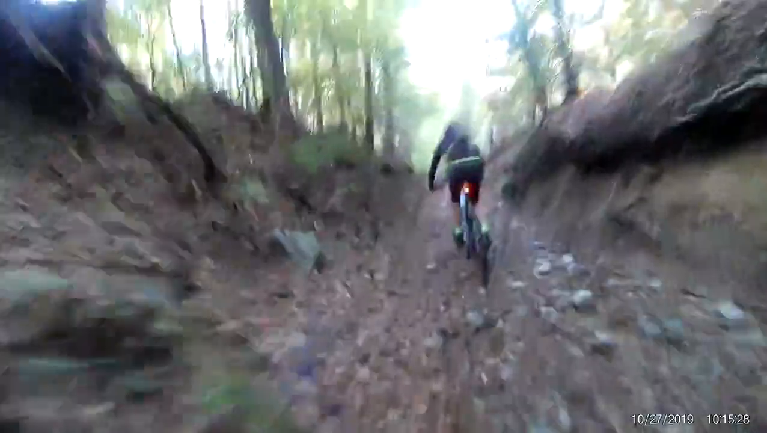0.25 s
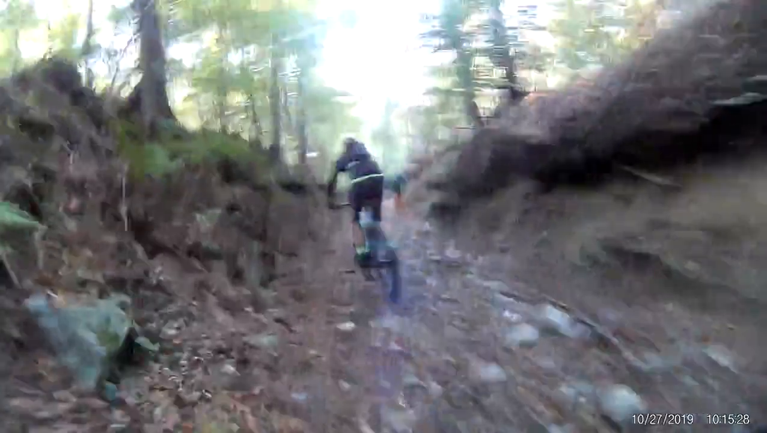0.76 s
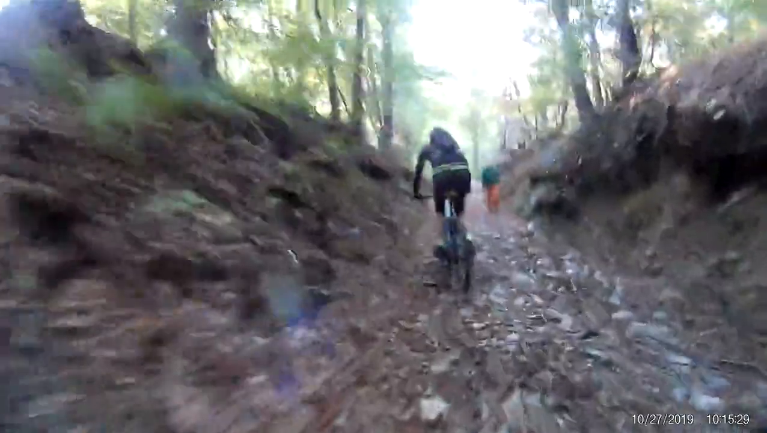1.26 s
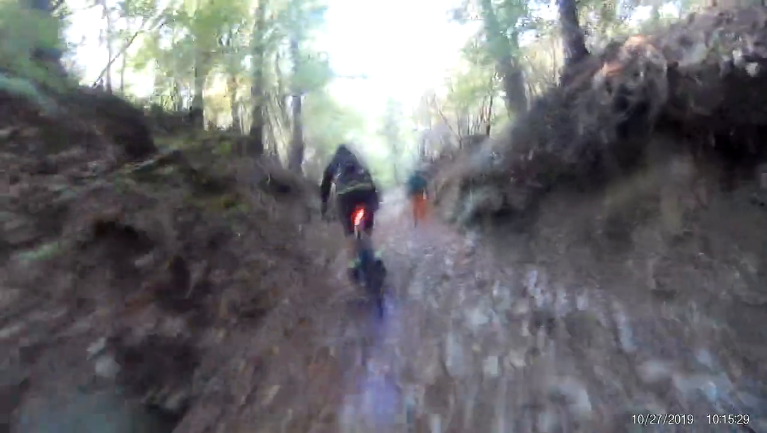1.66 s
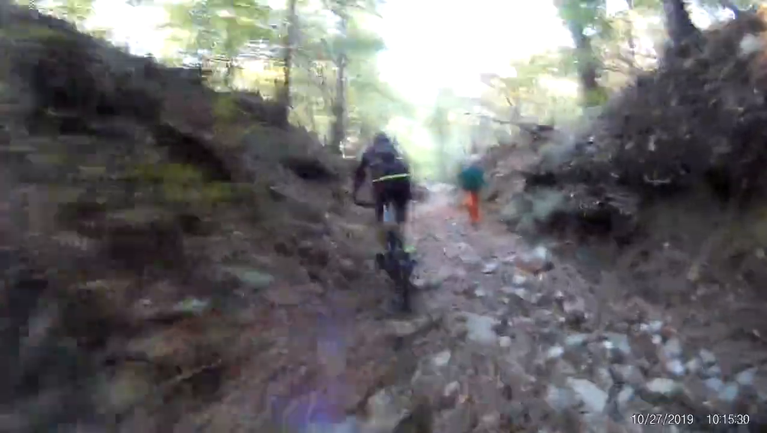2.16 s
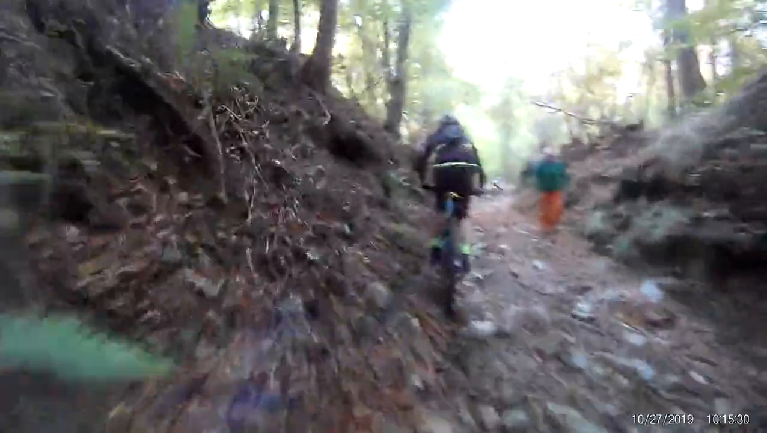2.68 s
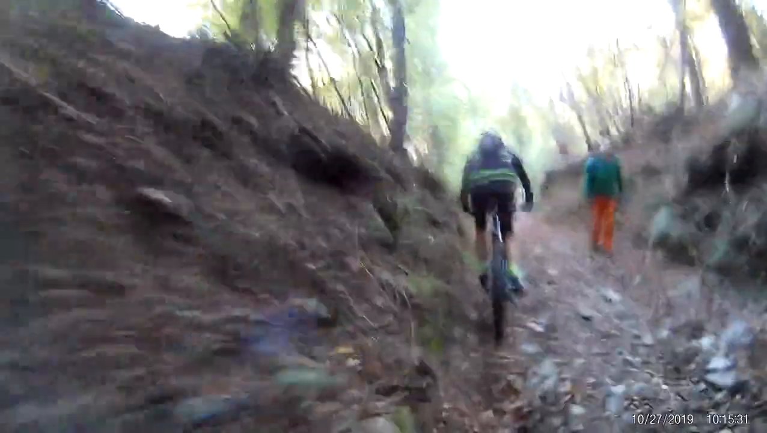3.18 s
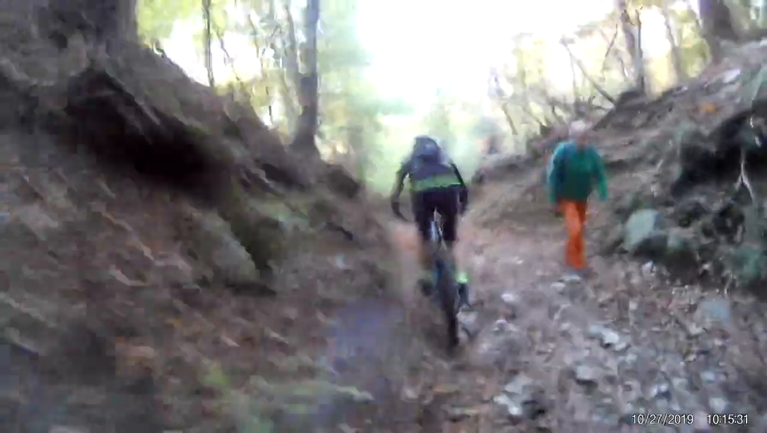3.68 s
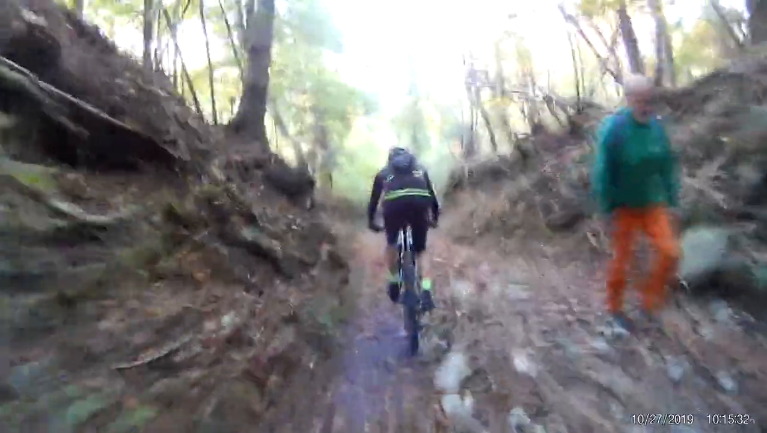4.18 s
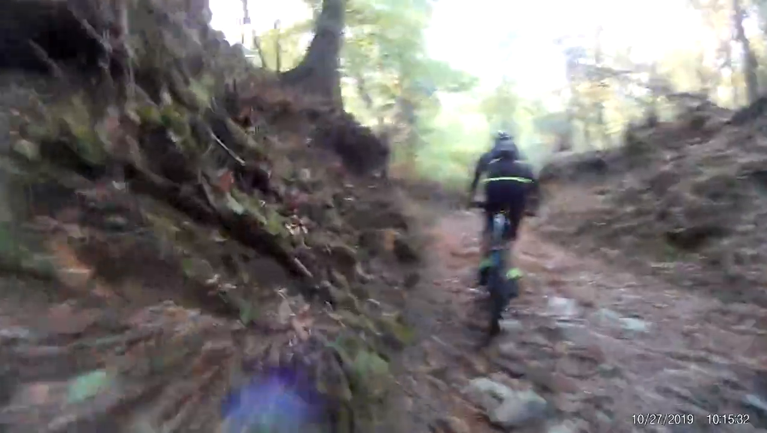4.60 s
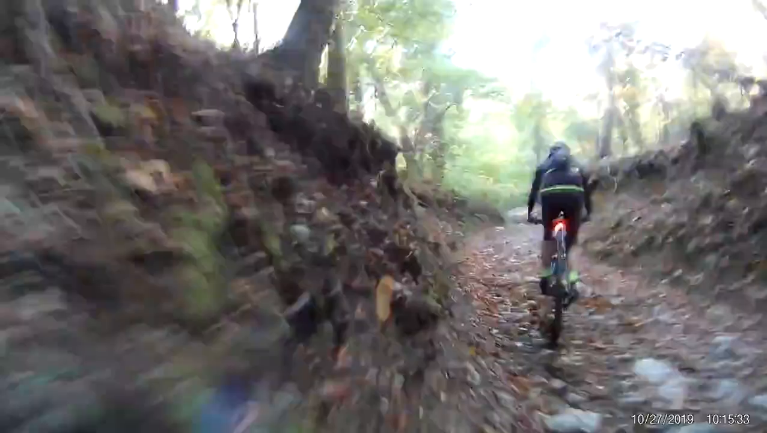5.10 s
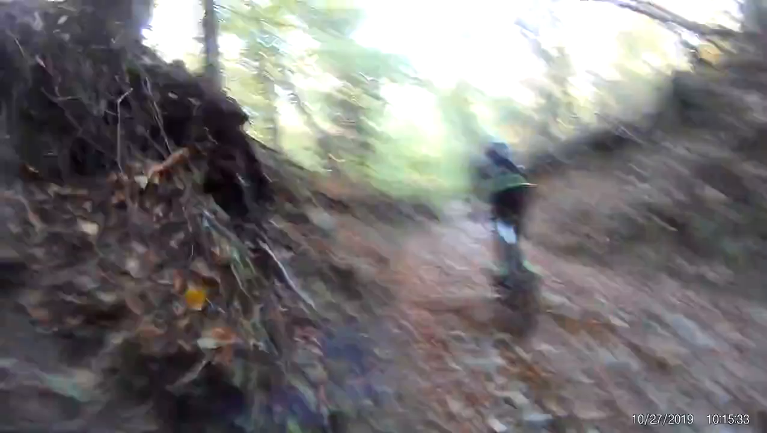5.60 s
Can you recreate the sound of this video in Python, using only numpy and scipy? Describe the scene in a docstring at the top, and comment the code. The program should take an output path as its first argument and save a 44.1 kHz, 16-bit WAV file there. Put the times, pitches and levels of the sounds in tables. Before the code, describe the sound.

A mountain bike runs along a stony forest trail, heard through a sealed camera clamped to it. Tyres buzz over a low rumble, with sharp ticks and rattles throughout. Three hard landings come early, with knocks and hollow clunks. Lighter bumps follow and bunch together past the middle, then the largest brings a brief overloaded crunch, and another heavy thump lands near the end. Everything sounds muffled.

```python
"""A mountain bike runs down a stony forest trail, heard through a sealed camera clamped to it.
From the start, tyre buzz and sharp ticks travel up the frame and ring the housing. Three hard landings
in about a second shove the camera, with knocks and hollow tube clunks. Lighter bumps then swing it on
its mount, bunching near 3.6 s; the largest, at 4.7 s, brings the crunch of an overloaded microphone,
and another heavy one comes at 5.5 s. Throughout, the closed case muffles the treble over a faint hiss."""
import sys
import numpy as np
from scipy.fft import rfft, irfft, next_fast_len
from scipy.io import wavfile
from scipy.ndimage import uniform_filter1d, map_coordinates

SR = 44100
rng = np.random.default_rng(int(sys.argv[2]) if len(sys.argv) > 2 else 0)


def log_audio(samples):
    """Write samples as a 16-bit WAV file to the path given in sys.argv[1]."""
    # one column per channel
    frames = np.atleast_2d(samples).T
    # limit to full scale, then quantise
    limited = np.clip(frames, -1, 1)
    pcm = np.round(limited * 32767).astype(np.int16)
    wavfile.write(sys.argv[1], SR, pcm)


N = 257984

# roughness of the trail: (t/s, mount shake level/dB, tyre buzz level/dB)
TRAIL = [(0.0, -23, -30.5), (0.44, -19.5, -31.5), (0.7, -21, -30.5), (0.95, -25.5, -33.5), (1.32, -24, -32),
         (1.81, -25, -31.5), (2.15, -21, -32), (2.54, -26.5, -33), (3.05, -19, -30.5), (3.39, -25, -33),
         (3.78, -19, -30), (4.22, -22.5, -30.5), (4.61, -21.5, -30.5), (5.03, -22, -31.5),
         (5.28, -20.5, -31), (5.62, -28.5, -32.5), (5.85, -16, -28.5)]
# sharp ticks; the two near 4.68 s stand for the crunch of the overloaded microphone on the largest bump:
# (t/s, level/dB, relative crack level/dB)
TICKS = [(0.037, -29.5, -30.5), (0.16, -21, -24), (0.181, -30, -32), (0.186, -14, -31.5),
         (0.2336, -24, -23.5), (0.2426, -25, -48), (0.2867, -31.5, -42), (0.307, -27, -34),
         (0.3256, -27, -33.5), (0.369, -28.5, -31), (0.5636, -27, -25), (0.5779, -26, -20),
         (0.6167, -14.5, -30), (0.6596, -20, -50), (1.043, -36, -21), (1.058, -29, -21.5),
         (1.084, -35, -18.5), (1.1029, -18.5, -26), (1.1315, -24.5, -29), (1.2678, -25.5, -42),
         (1.286, -29, -41), (1.345, -28.5, -40), (1.469, -35, -26), (1.484, -22, -32.5), (1.5365, -21, -28),
         (1.6363, -17, -28), (1.726, -29, -33), (1.921, -24.5, -40), (2.3022, -18.5, -23.5),
         (2.3228, -23.5, -29.5), (2.355, -23.5, -33), (2.38, -22, -36), (2.448, -32.5, -26.5),
         (2.544, -33.5, -24.5), (2.678, -35.5, -26.5), (2.8279, -27.5, -32), (2.938, -23.5, -15),
         (3.041, -21.5, -30), (3.171, -16, -28), (3.1863, -31.5, -42), (3.233, -31.5, -34),
         (3.2564, -21.5, -30), (3.2978, -28.5, -40), (3.3044, -24.5, -31.5), (3.5186, -26, -32.5),
         (3.6358, -27, -32), (3.6597, -11, -15), (3.695, -19, -23.5), (3.714, -26.5, -31),
         (3.7432, -32, -19), (3.921, -28, -30), (3.9859, -16, -23), (4.0118, -26.5, -36),
         (4.2287, -30.5, -28), (4.454, -38, -19), (4.541, -35, -22), (4.673, -37.5, -11.5),
         (4.6831, -30, -6), (4.806, -31, -29.5), (5.0535, -32.5, -25), (5.0798, -20.5, -29.5),
         (5.143, -37, -33), (5.538, -37.5, -25), (5.785, -30.5, -39)]
# dull knocks on the frame: (t/s, upper mode level/dB, lower mode level/dB)
KNOCKS = [(0.1341, -34, -22.5), (0.1615, -11.5, -25), (0.1755, -8.5, -5.5), (0.1854, -17.5, -10.5),
          (0.2359, -23, -20), (0.5581, -6.5, -9.5), (0.5794, -17, -14.5), (0.616, -18.5, -23),
          (0.6365, -14.5, -19.5), (0.6674, -10.5, -20), (0.8074, -26, -19), (1.0525, -16, -12.5),
          (1.0654, -28.5, -17), (1.1019, -15, -15.5), (1.1313, -21, -21), (1.267, -20, -16),
          (1.5384, -22.5, -26), (1.59, -21, -17.5), (1.62, -15.5, -15), (1.6354, -16.5, -18.5),
          (1.9155, -18, -14.5), (2.3022, -17.5, -18.5), (2.3241, -20, -24), (2.357, -22, -36.5),
          (2.379, -22.5, -24), (2.9218, -18, -21), (2.9362, -4.5, -8), (2.9564, -13, -17),
          (3.041, -13.5, -12), (3.1697, -12, -13.5), (3.2575, -22.5, -19.5), (3.6132, -20, -20.5),
          (3.6361, -13.5, -15.5), (3.6606, -9.5, -10), (3.6975, -13, -12.5), (3.9519, -17.5, -23),
          (3.9858, -19, -15), (4.0282, -20, -15), (4.1305, -16.5, -18), (4.4712, -17, -27.5),
          (4.5386, -19, -14), (4.592, -9.5, -21.5), (4.6673, -19.5, -18), (4.7087, -15, -17.5),
          (4.8045, -23, -36.5), (5.0804, -20, -15), (5.1816, -23, -13.5)]
# hard landings that shove the whole camera: (t/s, level/dB)
LANDINGS = [(0.154, -2.5), (0.573, -2.5), (1.05, -4), (1.256, -9.5), (1.461, -11), (1.629, -15.5),
            (2.297, -10.5), (3.959, -8), (4.444, -16.5), (4.672, -6.5), (5.03, -11), (5.555, -19)]
# hollow clunks of the tubes when the fork takes a stone: (t/s, level/dB, f/Hz)
CLUNKS = [(0.161, -9, 317), (0.175, -19, 278), (0.564, -20.5, 454), (0.584, -12.5, 336), (1.059, -10, 328),
          (1.639, -18, 265), (1.81, -26, 295), (1.887, -26, 192), (2.937, -16, 501), (3.118, -22.5, 264),
          (3.474, -23.5, 262), (3.606, -17.5, 271), (3.661, -19.5, 284), (3.952, -21.5, 337),
          (4.526, -29, 322), (4.667, -22.5, 360), (5.034, -16.5, 318), (5.557, -22, 176), (5.693, -24, 318)]
# bumps under the wheel and the swing they excite: (t/s, level/dB, f/Hz)
BUMPS = [(0.198, -10, 63), (0.451, -15, 65.7), (0.6, -8.5, 67.8), (0.858, -20, 59.4), (1.072, -5.5, 57.8),
         (1.121, -11, 61), (1.258, -12.5, 57), (1.453, -10.5, 56.7), (1.622, -25, 60), (1.701, -12.5, 56.8),
         (1.869, -15, 59.8), (2.017, -12.5, 54), (2.282, -14.5, 65.2), (2.517, -14.5, 60.5),
         (2.661, -19.5, 57.4), (2.82, -17.5, 57.8), (2.92, -15.5, 73.7), (3.165, -17, 62.3),
         (3.386, -11, 65.3), (3.57, -12, 63.4), (3.633, -11.5, 62.6), (3.683, -10.5, 59.7),
         (3.741, -13, 60.5), (3.93, -15.5, 65.8), (4.227, -13.5, 60.6), (4.428, -14.5, 54.8),
         (4.542, -12.5, 52.5), (4.662, 0, 61.1), (4.711, -12.5, 60.4), (5.007, -10.5, 60.5),
         (5.046, -9, 55.5), (5.297, -24.5, 66.2), (5.548, -3.5, 60.2), (5.613, -9, 56.8),
         (5.816, -8.5, 55.5)]

# normal modes: (f/Hz, bandwidth/Hz, relative level/dB)
MOUNT_MODES = [(29.6, 16.9, -1), (63.6, 12, 4), (120.5, 11, -29)]  # camera swinging on its clamp
FRAME_MODES = [(181, 98, -6.5), (327, 44.8, 5), (517, 60.6, -5.5)]  # hollow tubes
UPPER_MODES = [(1504, 49, 0.5), (1605, 53, 3), (1702, 53, 1.5), (1766, 89, -1), (1957, 240, -9.5)]  # housing, upper range
LOWER_MODES = [(785, 72, 1), (891, 83.4, 1), (1030, 76, -1), (1297, 168, -7.5)]  # housing, lower range
PANEL_MODES = [(2090, 60, -2), (2717, 280, 2.5), (3320, 340, -6.5), (3970, 200, -10)]  # case panels under steady shaking
SHELL_MODES = [(1801, 143, 14), (2480, 440, 1.5), (3010, 210, -2), (3640, 560, -7.5), (3980, 300, -4.5)]  # case under a sharp tick
CRACK_MODES = [(4830, 1700, 6.5), (6700, 1500, 5), (10300, 4500, -12.5)]  # broad crack on top of a tick

# muffling by the closed case: (f/Hz, relative level/dB)
UPPER_MUFFLING = [(2050, -5.5), (2300, -10), (4200, -33), (4600, -43), (7000, -53), (15000, -69.5)]
LOWER_MUFFLING = [(600, 4.5), (740, -3.5), (1400, 2.5), (2100, -16), (4200, -28.5), (7000, -45.5)]
GRIT_MUFFLING = [(1900, -12), (2200, -2.5), (4150, -4), (4500, -3.5), (7000, -21), (9000, -52)]
TICK_MUFFLING = [(1500, -2), (4150, -4), (4500, -10.5), (7000, -31.5), (15000, -39.5)]


def amp(db):
    """Amplitude ratio of a level in decibels."""
    return 10 ** (np.asarray(db) / 20)


def unit(x):
    """Normalisation to rms 1."""
    return x / np.sqrt(np.mean(x ** 2) + 1e-20)


def wobble(rate):
    """Spline interpolation through random knots, rate of them a second."""
    return map_coordinates(rng.standard_normal(int(N * rate / SR) + 4), [np.arange(N) * rate / SR])


def filtered(x, response):
    """Linear filtering: the spectrum of x times a complex frequency response."""
    size = next_fast_len(N + SR // 2)
    return irfft(rfft(x, size) * response(np.fft.rfftfreq(size, 1 / SR)), size)[..., :N]


def ring(x, modes, colour=((1, 0),)):
    """Modal superposition under a (f/Hz, level/dB) colour; a unit impulse peaks at 1."""
    colour_hz, colour_db = np.transpose(colour)

    def response(f):
        resonances = sum((-1) ** k * amp(db) * 1j * f * width / (hz * hz - f * f + 1j * f * width)
                         for k, (hz, width, db) in enumerate(modes))
        return resonances * amp(np.interp(np.log(f + 1), np.log(colour_hz), colour_db))

    impulse_response = irfft(response(np.fft.rfftfreq(8192, 1 / SR)))
    return filtered(x, response) / np.abs(impulse_response).max()


def grains(rate, spread_db):
    """Shot noise: random impulses, a few much larger than the rest."""
    size = amp(spread_db * rng.exponential(size=N)) * rng.standard_normal(N)
    return unit(size * (rng.random(N) < rate / SR))


def stroke(t, rise_s, t60_s):
    """Envelope of a damped vibration: soft rise, exponential decay, peak 1."""
    fade = amp(-60 * t / t60_s) * (1 - np.exp(-t / rise_s))
    return fade / fade.max()


def tyre_buzz(flutter):
    """Structure-borne sound: tread impacts drive the upper and lower housing modes."""
    upper, lower = flutter * [grains(1200, spread_db=2) + 1.07 * rng.standard_normal(N) for _ in range(2)]
    return (unit(ring(upper, UPPER_MODES, UPPER_MUFFLING))
            + amp(-2.5) * unit(ring(lower, LOWER_MODES, LOWER_MUFFLING)))


def gravel_grit(flutter):
    """Random excitation: gravel keeps the case panels ringing."""
    gravel = flutter * (grains(540, spread_db=3) + 2.1 * rng.standard_normal(N))
    return unit(ring(gravel, PANEL_MODES, GRIT_MUFFLING))


def pebble_crackle():
    """Impact noise: each pebble contact is a burst of a few milliseconds that rings the shell."""
    touches = np.abs(grains(150, spread_db=3))
    contact = amp(-60 * np.arange(400) / SR / 0.01)
    pebbles = np.convolve(touches, contact)[:N] * rng.standard_normal(N)
    shell = unit(ring(pebbles, SHELL_MODES[1:], GRIT_MUFFLING))
    crack = unit(ring(pebbles, CRACK_MODES[:2], [(7000, -1), (9000, -26.5)]))
    return shell + amp(-22) * crack


def rolling(jolt):
    """Forced vibration: rough ground shakes mount, frame and housing; loose parts chatter in a jolt."""
    times, *levels = np.transpose(TRAIL)
    shake_db, buzz_db = [np.interp(np.arange(N) / SR, times, db) for db in levels]
    roughness_db = buzz_db + 31.5  # 0 on usual ground
    drone_db = -37.5 + 1.2 * roughness_db
    grit_db = -54 + 0.75 * roughness_db
    # four flickering gains with a slower part in common
    flutter = amp(1.1 * wobble(14) + np.array([1.32 * wobble(45) for _ in range(4)]))
    buzz = amp(buzz_db) * tyre_buzz(flutter[:2])
    grit = amp(grit_db) * gravel_grit(flutter[2])
    crackle = amp(grit_db - 5) * pebble_crackle()
    mount = ring(rng.standard_normal(N), MOUNT_MODES, [(90, 3), (150, -20), (400, -42.5)])
    frame = ring(flutter[3] * rng.standard_normal(N), FRAME_MODES, [(500, -18.5), (900, -5)])
    shake = amp(shake_db) * unit(mount)
    drone = amp(drone_db) * unit(frame)
    chatter = uniform_filter1d(np.abs(jolt), size=900)  # mean over 20 ms
    return shake + (1 + 6 * chatter) * (drone + crackle) + (1 + 1.1 * chatter) * buzz + (1 + chatter) * grit


def ticks(burst_t60_s=0.019, crack_t60_s=0.0054):
    """A short burst has a broad spectrum: it rings the shell, and the brightest also crack or crunch."""
    drive, t = np.zeros((2, N + SR)), np.arange(SR // 40) / SR
    for s, db, crack_db in TICKS:
        burst = 0.28 * rng.standard_normal(len(t)) * amp(-60 * t / burst_t60_s)
        burst[20] += 1  # sharp onset
        crack = amp(crack_db) * burst * amp(-60 * t / crack_t60_s)
        drive[:, round(s * SR):][:, :len(t)] += amp(db) * np.array([burst, crack])
    return ring(drive[0, :N], SHELL_MODES, TICK_MUFFLING) + ring(drive[1, :N], CRACK_MODES)


def knocks(rattle_t60_s=0.05):
    """Impulse response: a blow and a short rattle of loose parts ring the housing."""
    drive, t = np.zeros((2, N + SR)), np.arange(SR // 8) / SR
    for s, upper_db, lower_db in KNOCKS:
        rattle = 0.063 * rng.standard_normal((2, len(t))) * amp(-60 * t / rattle_t60_s)
        rattle[:, 8] += 0.7  # the blow
        drive[:, round(s * SR):][:, :len(t)] += amp([[upper_db], [lower_db]]) * rattle
    upper, lower = drive[:, :N]
    return ring(upper, UPPER_MODES, UPPER_MUFFLING) + ring(lower, LOWER_MODES, LOWER_MUFFLING)


def landings(hz=29.7, rise_s=0.0013):
    """Rigid-body motion: a landing shoves the whole camera down and up for one slow cycle."""
    out, t = np.zeros(N + SR), np.arange(SR // 2) / SR
    one_cycle = np.exp(-(t * hz) ** 4) * (1 - np.exp(-t / rise_s))
    shove = one_cycle * np.sin(2 * np.pi * hz * t)
    for s, db in LANDINGS:
        out[round(s * SR):][:len(t)] -= amp(db) * shove
    return out[:N]


def clunks(thud_db=-23.5):
    """Damped free vibration: one tube mode swells and dies; a rough thud shakes the other tubes."""
    tone, thud, t = np.zeros(N + SR), np.zeros(N + SR), np.arange(SR // 5) / SR
    fade = stroke(t, rise_s=0.0014, t60_s=0.066)
    for s, db, hz in CLUNKS:
        tone[round(s * SR):][:len(t)] += amp(db) * fade * np.sin(2 * np.pi * hz * t)
        thud[round(s * SR):][:len(t)] += amp(db + thud_db) * fade * rng.standard_normal(len(t))
    return tone[:N] + ring(thud[:N], FRAME_MODES, [(700, -4.5), (1500, -26.5)])


def bumps():
    """Mass on a spring: the camera swings on a clamp that is stiffer one way, adding a second harmonic."""
    out, t = np.zeros(N + SR), np.arange(SR // 2) / SR
    fade = stroke(t, rise_s=0.021, t60_s=0.14)
    for s, db, hz in BUMPS:
        swing = np.sin(2 * np.pi * hz * t) + 0.13 * np.sin(4 * np.pi * hz * t)
        out[round(s * SR):][:len(t)] += amp(db) * fade * swing
    return out[:N]


def scene():
    """Superposition: all sources add at one microphone."""
    jolt = landings() + bumps()
    return (jolt + rolling(jolt) + clunks() + knocks() + ticks())[None]


def record(dry):
    """Soft saturation: the hissing input stage rounds the largest swings; a notch and band limit follow."""
    hiss = amp(-77.5) * rng.standard_normal(dry.shape)
    coupled = filtered(dry + hiss, lambda f: f ** 2 / (f ** 2 + 12 ** 2))  # 12 Hz high-pass
    rounded = coupled / (1 + np.abs(coupled / 0.95) ** 12) ** (1 / 12)
    notch_hz, width_hz, top_hz = 8000, 250, 15830
    dead_spot = lambda f: (notch_hz ** 2 - f ** 2) / (notch_hz ** 2 - f ** 2 + 1j * f * width_hz)
    return filtered(rounded, lambda f: (f < top_hz) * dead_spot(f))


dry = scene()
out = record(dry)
log_audio(out)
```